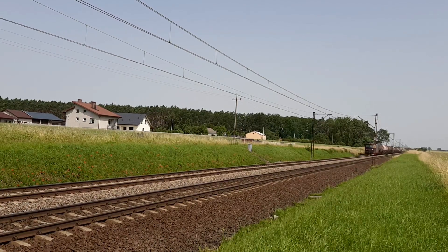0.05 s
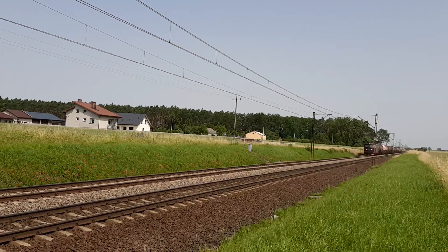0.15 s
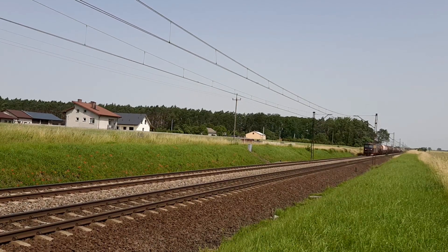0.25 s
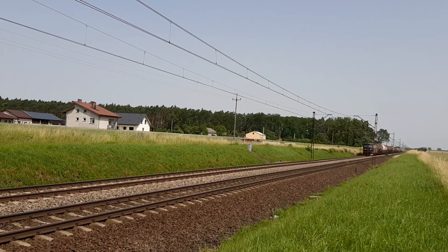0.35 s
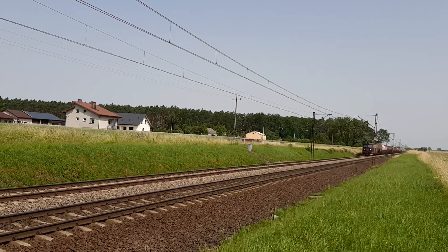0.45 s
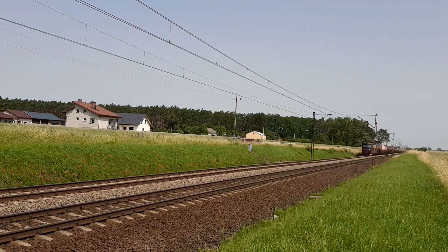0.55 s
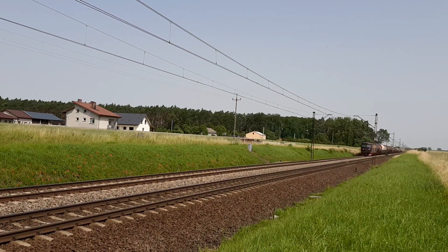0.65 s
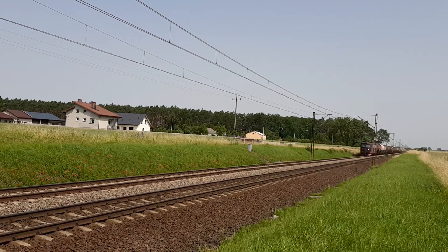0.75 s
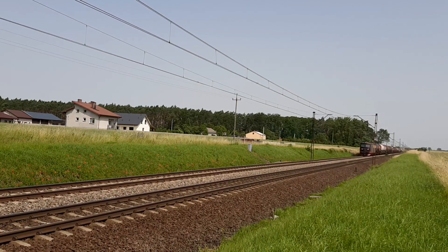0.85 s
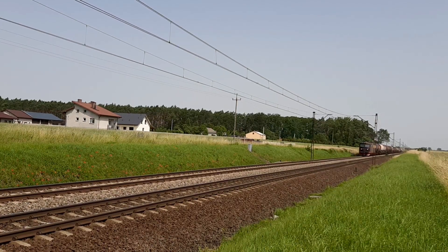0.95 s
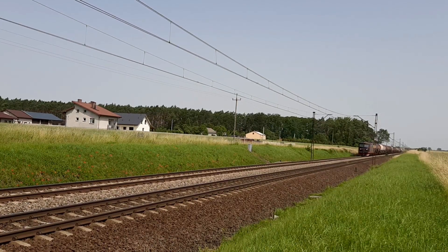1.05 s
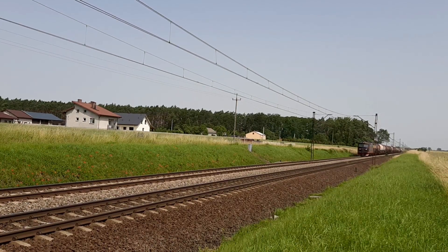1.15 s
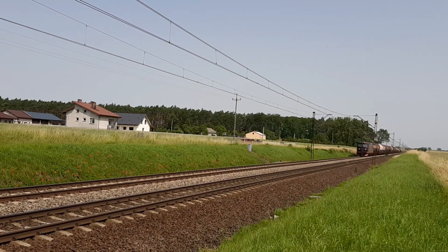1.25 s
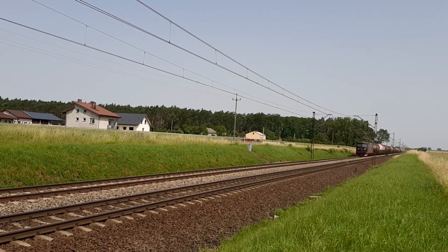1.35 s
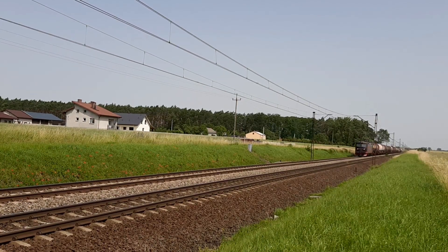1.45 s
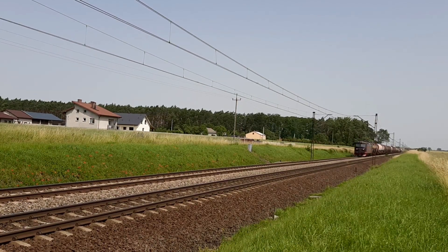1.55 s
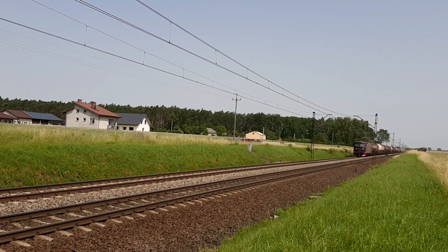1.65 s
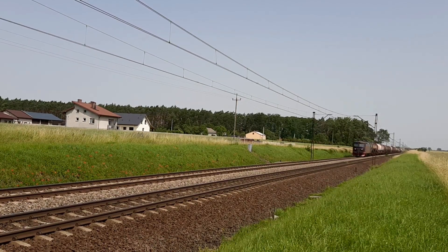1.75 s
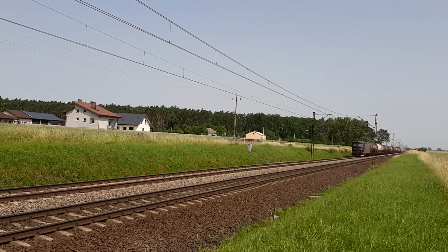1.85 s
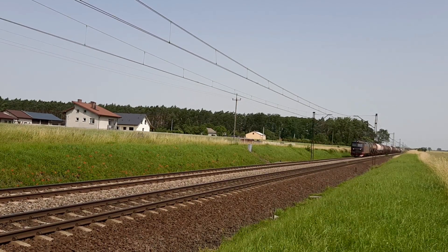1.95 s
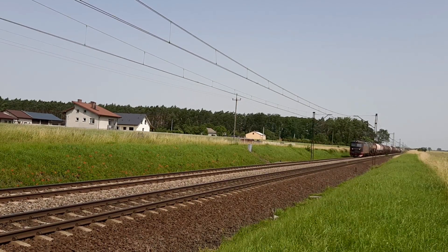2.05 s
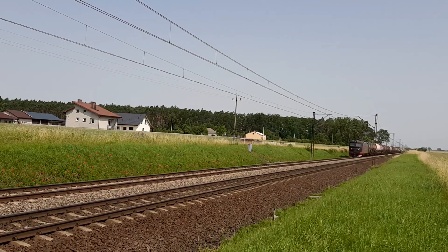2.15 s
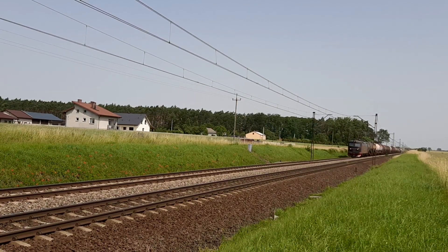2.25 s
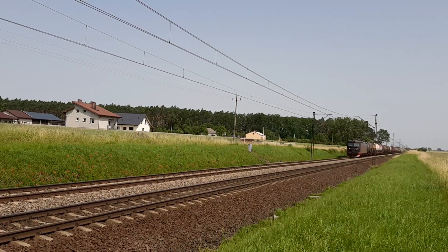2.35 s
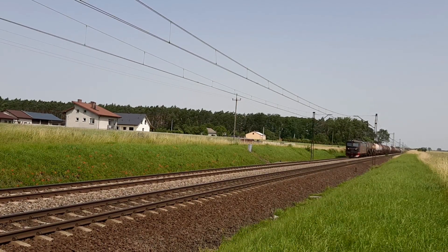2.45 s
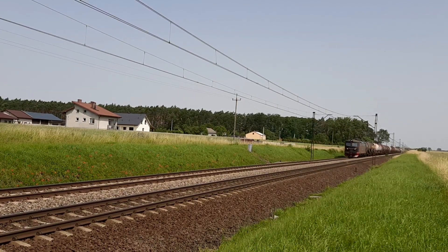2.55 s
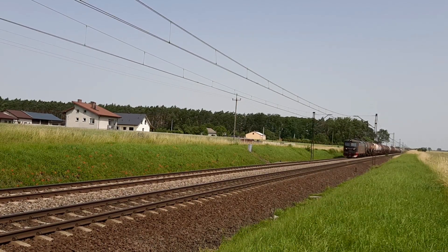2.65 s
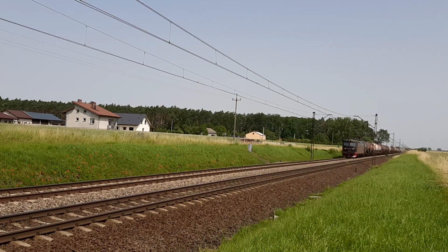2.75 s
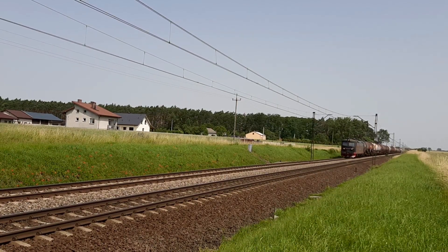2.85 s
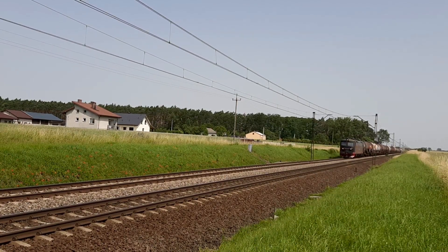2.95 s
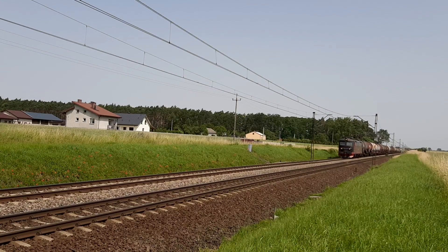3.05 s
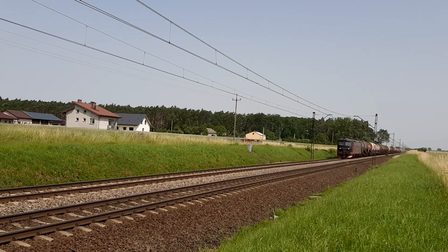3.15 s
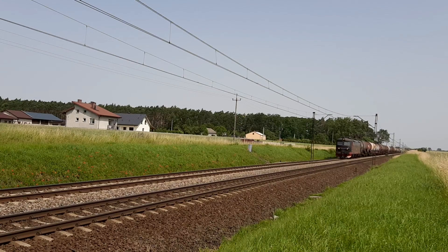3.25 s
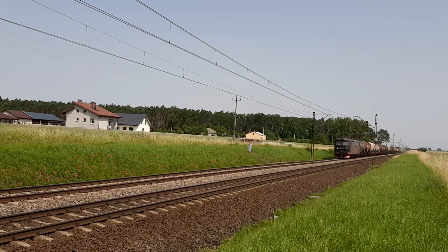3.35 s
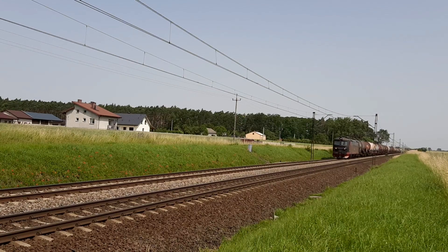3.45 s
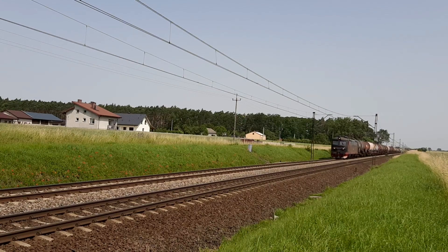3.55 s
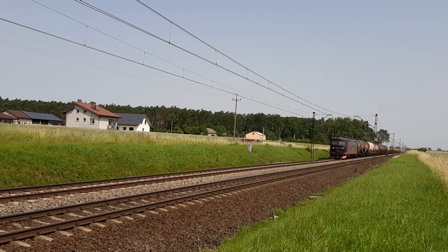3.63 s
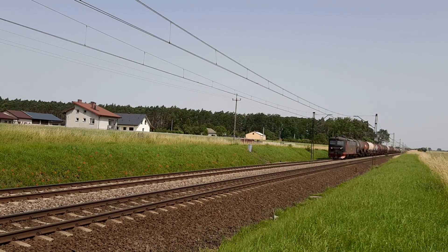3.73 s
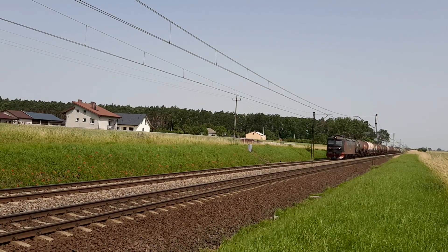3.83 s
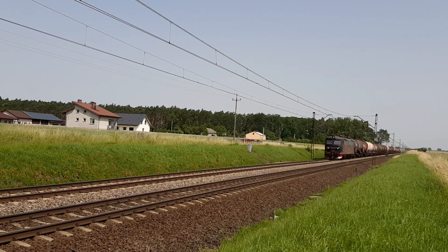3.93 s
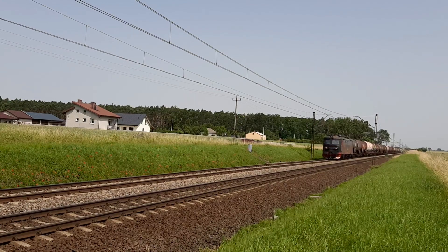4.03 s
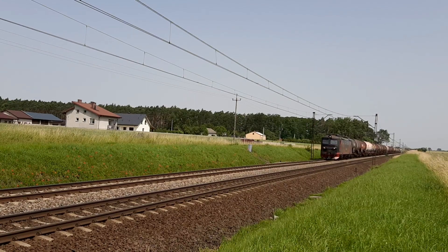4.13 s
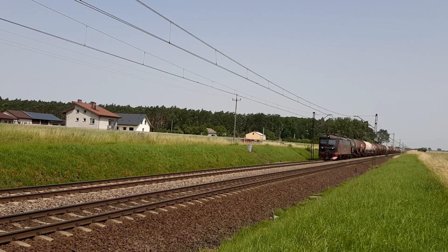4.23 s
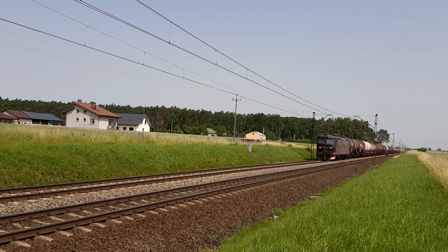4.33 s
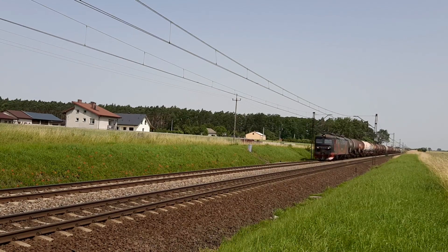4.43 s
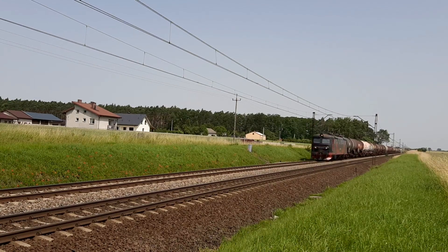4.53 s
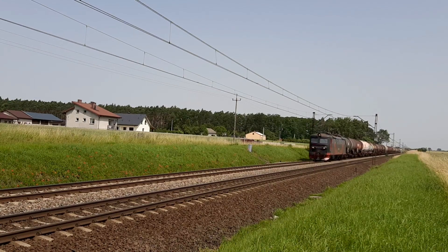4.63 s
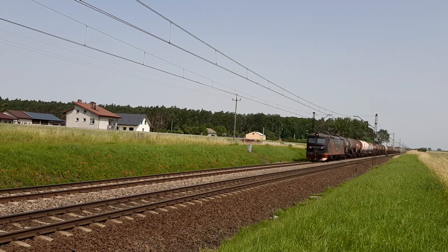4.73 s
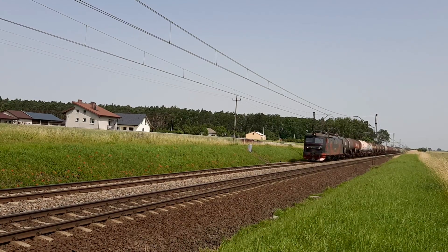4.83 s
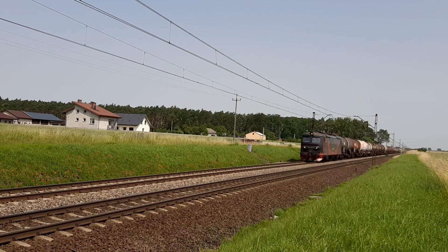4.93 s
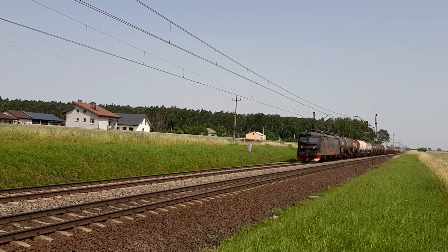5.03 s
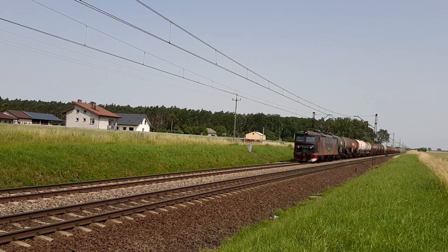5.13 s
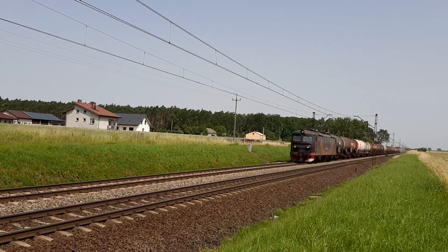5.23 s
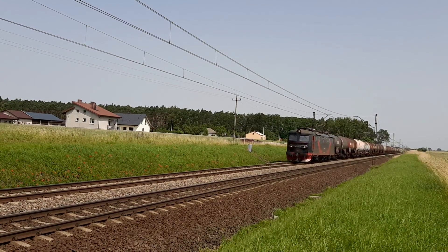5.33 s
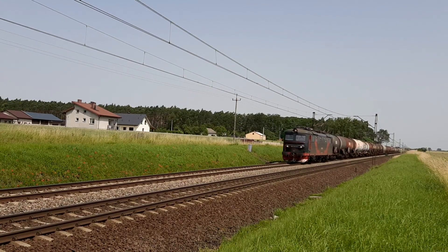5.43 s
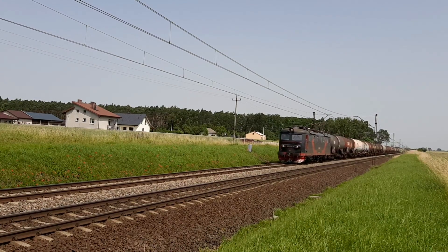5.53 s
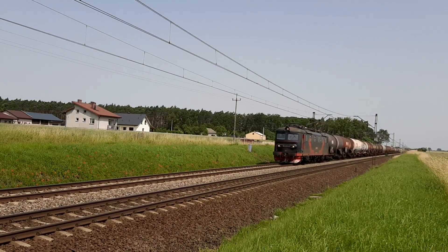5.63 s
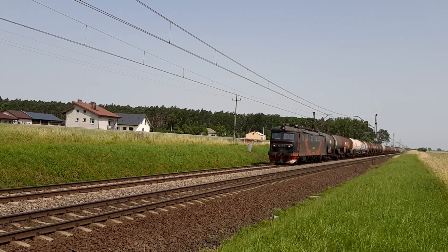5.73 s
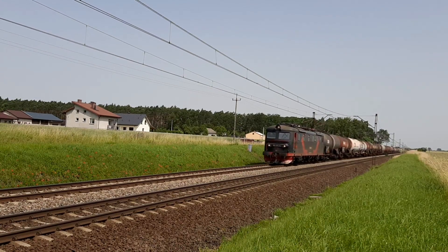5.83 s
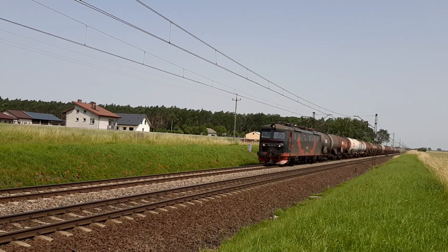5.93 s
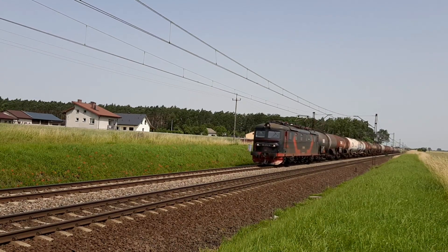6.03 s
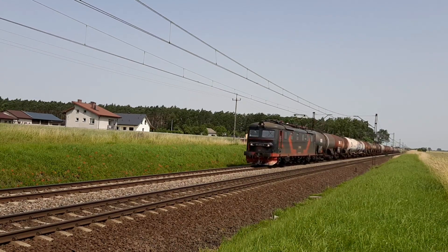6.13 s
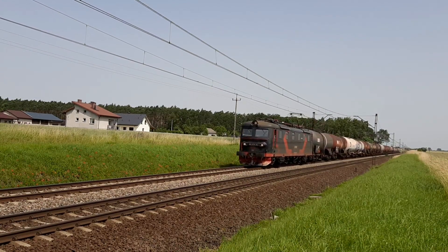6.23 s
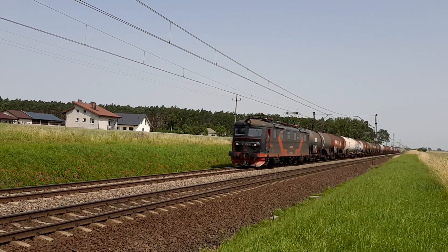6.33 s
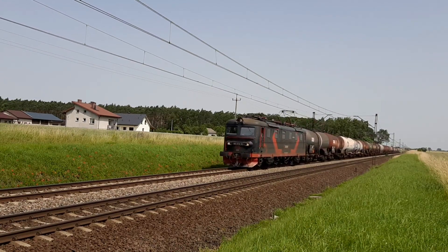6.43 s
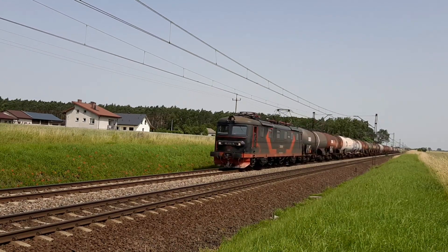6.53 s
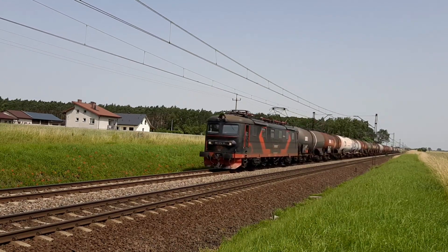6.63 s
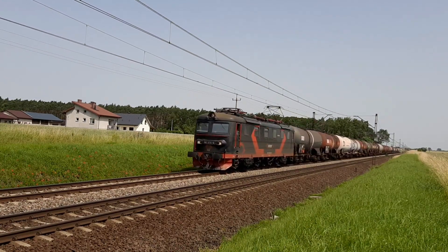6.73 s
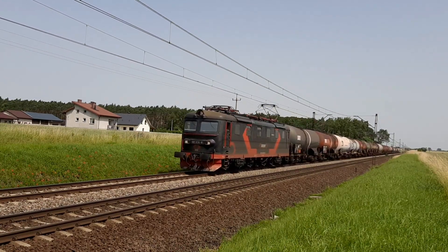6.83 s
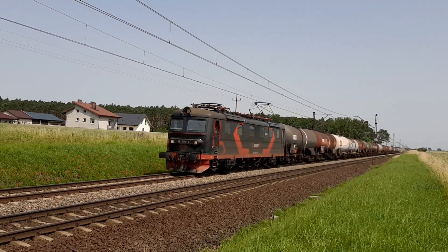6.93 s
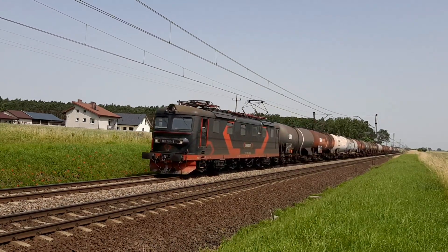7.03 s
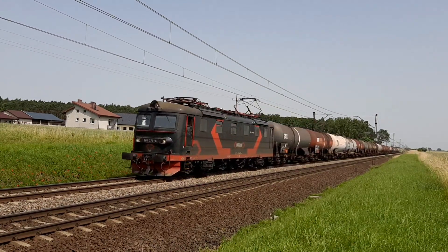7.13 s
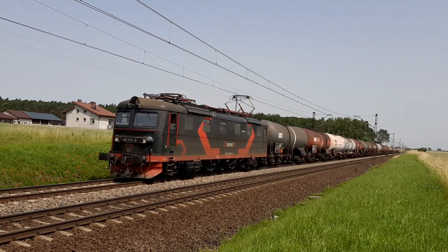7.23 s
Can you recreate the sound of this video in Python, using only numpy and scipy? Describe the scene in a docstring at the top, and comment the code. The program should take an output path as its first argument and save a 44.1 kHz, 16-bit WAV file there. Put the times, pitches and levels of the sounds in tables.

```python
"""From the start wind buffets two microphone ports, grass hisses, a rail whines, and a soft distant wash of an
electric freight train grows as it draws near. The rails sing ahead of it; a small bird chirps far off from 1.6 s
to 4 s. A hum rises at about 3 s and gears join near 6 s, as rumble and wheel roar swing from the right to the
front. The roar steps up at 6.75 s. Broad sounds are shaped noise, tones are wavering sines, eddies short pulses."""
import sys
import numpy as np
from scipy import signal
from scipy.fft import rfft, irfft, next_fast_len
from scipy.io import wavfile
from scipy.ndimage import uniform_filter1d, map_coordinates

SR = 44100
rng = np.random.default_rng(int(sys.argv[2]) if len(sys.argv) > 2 else 0)


def to_wav(sig):
    """Store sig (one row per channel, or 1-D mono) as 16-bit WAV at the path in sys.argv[1].

    Samples outside -1..1 are clipped; the rate is SR.
    """
    pcm = np.clip(np.atleast_2d(sig), -1, 1) * 32767
    pcm = np.round(pcm).astype(np.int16)
    wavfile.write(sys.argv[1], SR, pcm.T)  # frames by channels


N = 320818

# Phase between the ports for sounds that stay in place. Each row: frequency in Hz, lead of the left port in radians.
PORT_LEAD = [(0, -3.5), (340, 0.46), (1120, 2.5), (1380, 2), (1640, 6), (3010, 3.5), (3620, 1.5), (4130, 6),
             (6120, 8.5), (6890, 11), (7150, 2.5), (9220, 20.5), (11400, 28.5), (15300, 39.5)]
TOP_HZ = 15730  # upper band limit

# Soft distant wash of the far train. Each row: time in seconds, level in dB.
WASH_LEVEL = [(0, -58), (1.3, -58), (3.6, -54.5), (5.2, -50.5)]
# Spectrum of the wash. Each row: frequency in Hz, relative density in dB per Hz.
WASH_SPECTRUM = [(150, -46), (250, -19.5), (339, -1.5), (605, -5.5), (821, -4), (1150, -4.5), (1310, -22),
                 (1450, -8.5), (1770, -15), (3030, -16), (4110, -13.5), (6070, -17.5), (6820, -11.5),
                 (7230, -17.5), (8000, -47.5), (10400, -100), (17600, -120)]
# Correlation of the wash at the two ports. Each row: frequency in Hz, likeness (1 is identical).
WASH_LIKENESS = [(300, 0.18), (1500, 0.14), (5000, 0.068), (6000, 0.53), (6700, 0.46), (7500, 0.45)]
# Grass hiss before its offset at each port. Each row: time in seconds, level in dB.
GRASS_LEVEL = [(0.0, -70), (0.38, -76), (1.92, -72.5), (2.13, -76.5), (2.51, -68.5), (2.67, -71),
               (3.62, -73), (4.15, -66), (4.39, -70.5), (4.53, -64), (4.7, -67.5), (5.87, -60.5),
               (6.38, -62.5), (6.6, -60), (6.84, -61), (7.27, -57.5)]
# Spectrum of the grass hiss. Each row: frequency in Hz, relative density in dB per Hz.
GRASS_SPECTRUM = [(5060, -55.5), (8600, -44), (8750, -31), (9220, -10), (11200, -0.5), (12300, 3),
                  (13000, 2), (13800, -2), (14900, 2.5), (15600, -6.5)]

# Bird notes. Each row: start in seconds, length in seconds, start, middle and end pitch in Hz, level in dB.
BIRD_NOTES = [(1.591, 0.038, 4640, 3870, 3500, -55.5), (1.727, 0.016, 3500, 3570, 3650, -53.5),
              (1.9, 0.053, 3300, 3150, 3550, -57), (2.195, .04, 2680, 2720, 2680, -61),
              (2.283, 0.048, 3430, 3580, 3400, -55), (2.357, .035, 3670, 3580, 3650, -63),
              (2.437, 0.049, 4180, 3830, 3650, -59), (2.642, 0.032, 3230, 3320, 3320, -61),
              (2.93, 0.04, 2950, 2900, 2860, -62), (3.018, 0.04, 3830, 3620, 3500, -63),
              (3.77, .07, 3480, 3800, 4000, -63), (3.924, 0.085, 4080, 3800, 3750, -64)]
BIRD_DELAY_MS = .49  # the song reaches the left port this much later

# Wind flutter, mean of the two ports. Each row: time in seconds, level in dB.
WIND_LEVEL = [(0, -39), (.1, -59.5), (.45, -61), (.85, -71), (1.17, -62.5), (1.45, -74), (2.1, -67.5),
              (2.5, -53.5), (3.1, -63.5), (3.65, -59.5), (3.92, -52), (4.35, -51.5), (4.75, -54),
              (5, -49.5), (5.2, -54), (5.35, -42.5), (5.7, -53), (6.3, -51), (7.27, -48)]
# Which port the wind meets. Each row: time in seconds, left minus right level in dB.
WIND_LEAN = [(0, 3), (.9, 26.5), (1.6, 10.5), (3, 2.5), (4.4, -6), (5.1, 18.5), (5.6, -3), (7.27, 1.5)]
# Spectrum of the flutter. Each row: frequency in Hz, relative density in dB per Hz.
FLUTTER_SPECTRUM = [(12, -52), (20, -15.5), (48, 0), (70, -3), (103, -4.5), (253, -19.5), (300, -15),
                    (390, -41), (660, -120)]
# Strong eddies. Each row: moment in seconds, left level in dB, right level in dB, cycle rate in Hz.
STRONG_EDDIES = [(0.013, -37, -38, 71), (.038, -36, -32.5, 81.5), (.146, -43, -56, 81),
                 (.263, -36.5, -47, 100), (.288, -41, -45, 113), (.324, -36, -64, 86),
                 (0.483, -42, -40, 86), (0.641, -38, -55, 87), (.776, -43, -73, 65.5), (.82, -48, -73, 62),
                 (.964, -45, -74, 90), (1.062, -44, -70, 105), (1.203, -50, -45, 69), (1.373, -43, -70, 75),
                 (1.553, -45, -73, 93), (1.851, -55, -50, 67.4), (2.149, -48, -53, 85),
                 (2.272, -47, -57, 77.5), (2.383, -46, -68, 107), (2.456, -37.5, -48, 104),
                 (2.488, -49, -45, 91), (2.587, -46, -41, 80), (2.9, -50, -49, 75), (3.427, -47, -52, 83.4),
                 (3.545, -46, -47, 76.5), (3.825, -36, -36, 91), (3.875, -37, -59, 72),
                 (3.915, -39, -38, 121), (3.937, -35, -55, 95), (3.972, -36, -36, 83),
                 (4.014, -37, -45, 103), (4.095, -38, -40, 96), (4.384, -70, -36, 67),
                 (4.459, -45, -40, 107), (4.67, -38, -41, 116), (4.804, -39, -46, 75),
                 (4.845, -38, -41, 76), (4.986, -27, -56, 75), (5.089, -34, -62, 83), (5.178, -27, -58, 99),
                 (5.266, -32, -56, 69), (5.37, -30, -30, 99), (5.492, -35, -35, 101), (5.793, -32, -32, 92),
                 (5.879, -38, -36, 95), (5.93, -37, -33, 99), (6.108, -37, -37, 130),
                 (6.194, -42, -43, 105)]
# Lesser eddies: median rate, level over the wind and its scatter, median cycle rate.
SMALL_PER_S, SMALL_DB, SMALL_SCATTER_DB, SMALL_HZ = 5, 7, 3, 88

# Resonances of the rail ahead. Each row: frequency in Hz, width in Hz, relative level in dB.
RAIL_MODES = [(653, 53, -3), (787, 176, -4), (886, 32, -6), (977, 74, -8)]
# Spectrum of the rail under the locomotive. Each row: frequency in Hz, relative density in dB per Hz.
UNDER_SPECTRUM = [(320, -42), (540, -31.5), (617, 0), (702, -1.5), (750, -5.5), (852, -6.5), (951, -12),
                  (1080, -18), (1150, -14.5), (1500, -38), (2530, -120)]
# Phase of that sound. Each row: frequency in Hz, lead of the left port in radians.
UNDER_LEAD = [(480, 0.88), (600, 1.3), (1100, 1.3)]
# Arrival of that sound. Each row: time in seconds, its share of the rail sound's power from 0 to 1.
ARRIVAL = [(5.8, 0.015), (6.6, 0.99)]
# Clear rail notes that grow with the hum. Each row: frequency in Hz, width in Hz, relative level in dB.
SINGING_MODES = [(662.5, 12, 0), (497, 9, -3)]
NOTE_DB = -3.5  # the rail notes against the hum
# Whine between two neighbouring modes. Each row: time in seconds, upper mode's share of power, level in dB.
WHINE = [(0, 0.86, -51), (.4, 0.92, -58), (1.2, 0.97, -56), (2.3, 0.1, -50.5), (3.5, .01, -49.5),
         (4.85, 0.03, -41), (5, 0.03, -44), (6.5, 0.5, -44), (7.27, .9, -44)]

# Spectrum of the body panels. Each row: frequency in Hz, relative density in dB per Hz.
BODY_SPECTRUM = [(120, -36.5), (200, -16), (264, -11), (311, -8.5), (355, -9), (419, -3), (466, -4.5),
                 (523, -15), (600, -9), (780, -31), (1320, -120)]
# Modes of the body. Each row: frequency in Hz, width in Hz, relative level in dB.
FRAME_MODES = [(292, 20, 2), (322, 14.6, 4), (386.5, 10.2, 5)]
# Spectrum of the low rolling sound. Each row: frequency in Hz, relative density in dB per Hz.
ROLL_SPECTRUM = [(15, -44), (30, -23), (55, -2.5), (85, 6.5), (120, 1), (170, -0.5), (250, 1), (330, -38),
                 (570, -120)]
# Spectrum of the wheel roar. Each row: frequency in Hz, relative density in dB per Hz.
ROAR_SPECTRUM = [(650, -50), (1100, -22.5), (1210, -5), (1260, 2.5), (1400, -9.5), (1520, 0), (1680, -5),
                 (1920, -5), (2070, -0.5), (2190, -4), (2490, -3.5), (3100, -13), (4030, -43), (6820, -120)]
# Wheel modes. Each row: frequency in Hz, width in Hz, relative level in dB.
WHEEL_MODES = [(1298, 11, -47.5), (1821, 13, -49), (2350, 25, -47.5), (2565, 21, -49.5), (1540, 25, -59.5),
               (1994, 25, -51.5), (2437, 39, -48), (2480, 10, -51.5), (3835, 18, -53)]
# Spectrum of the upper roar. Each row: frequency in Hz, relative density in dB per Hz.
GRIT_SPECTRUM = [(1760, -35), (3000, -3.5), (3330, -2.5), (3670, -2.5), (5630, -7), (6960, -16.5),
                 (8480, -35.5), (9000, -30.5), (11700, -56), (19800, -120)]
# Gear mesh of the leading bogie. Each row: time in seconds, level in dB.
GEAR_LEVEL = [(6.1, -52), (6.35, -33.5), (6.55, -33), (6.75, -23.5), (7, -25), (7.27, -28)]
# Harmonics of the gear mesh. Each row: multiple of the mesh frequency, relative level in dB.
MESH_HARMONICS = [(1, 0), (2, -20.5), (3, -20)]
# A second, slightly higher hum. Each row: time in seconds, level in dB.
HUM_LEVEL = [(3, -75), (3.8, -55.5), (4.5, -49.5), (5.2, -43.5), (5.7, -38.5), (6.2, -43), (6.7, -33),
             (7.27, -34)]
MESH_HZ, HUM_HZ = 416.3, 436.5

# The locomotive's speed, the moment it would draw level, the gap to the track.
SPEED_M_S, PASS_S, SIDE_M = 17.5, 8.529, 9.2
NEAR_M = 25  # reference distance for the growth levels
# Growth laws of five parts. Each row: level in dB at NEAR_M, spreading in dB per tenfold distance,
# loss in dB per metre.
RAILS_GROW = (-30, 3.8, 0.27)
RUMBLE_GROWS = (-26.5, 23.2, 0.28)
ROLL_GROWS = (-34.5, 20, 0.31)
ROAR_GROWS = (-30.5, 48.5, 0.074)
GRIT_GROWS = (-33.5, 11.6, 0.64)
GRIT_FULL_DB = -40  # close by, the upper roar stops growing
# Sound travel time between the ports; radians from the track to the front of the microphone.
PORTS_MS, AIM_RAD = 0.7, .33
JUDDER_DB, JUDDER_PER_S = 1.3, 20  # uneven wheels shake rail and body in quick swells
STEP_S, STEP_RISE_S, STEP_DB = 6.75, .015, 2.5  # the roar of the wheels steps up suddenly


def amp(db):
    """Decibels are twenty times the logarithm of amplitude."""
    return 10 ** (np.asarray(db) / 20)


def unit(x):
    """Dividing by the root mean square gives a signal unit power."""
    return x / np.sqrt(np.mean(x ** 2) + 1e-20)


def along(points, hz):
    """Interpolation of (Hz, value) points on a logarithmic frequency axis."""
    f, v = np.transpose(points)
    return np.interp(np.log(hz + 1), np.log(f + 1), v)


def curves(rows):
    """Linear interpolation in time: one value per sample for each column after the time."""
    s, *cols = np.transpose(rows)
    return [np.interp(np.arange(N) / SR, s, c) for c in cols]


def faded(rows, fade_db):
    """Onset of a level curve (last column): a rise over the 0.6 s before its first row."""
    first = rows[0]
    return [(first[0] - .6, *first[1:-1], first[-1] + fade_db), *rows]


def wobble(rate):
    """Band-limited random fluctuation: a smooth curve through rate random knots a second."""
    knots = rng.standard_normal(int(N * rate / SR) + 4)
    return map_coordinates(knots, [np.arange(N) * rate / SR])


def tone(hz, waver_hz):
    """Phase is the integral of frequency, here one that wavers at random."""
    return 2 * np.pi * np.cumsum(hz + waver_hz * wobble(25)) / SR


def filtered(x, response):
    """Linear filtering: the spectrum of x times a complex response of frequency."""
    m = next_fast_len(N + 8192)
    return irfft(rfft(x, m) * response(np.fft.rfftfreq(m, 1 / SR)), m)[..., :N]


def modes(table):
    """Incoherent summation: the powers of noise-driven resonances add."""
    def gain(f):
        return np.sqrt(sum(amp(2 * db) / (1 + ((f - c) * 2 / w) ** 4) for c, w, db in table))
    return gain


def shape(points):
    """Spectral density set by a gain curve over frequency."""
    return lambda f: amp(along(points, f))


def rush(gain, alike, patchy_db, lead=((0, 0),)):
    """Partial coherence: patchy stereo noise of rms 1; lead is the phase of the left port over the right."""
    z = signal.stft(rng.standard_normal((2, N)), nperseg=512)[2]
    patches = rng.standard_normal(z.shape[1:])
    patches = uniform_filter1d(uniform_filter1d(patches, 6, 0), 12, 1)
    pair = signal.istft(z * amp(patchy_db * unit(patches)), nperseg=512)[1][:, :N]

    def mid_side(f):
        # the angle splits power so that the ports correlate as alike asks
        angle = np.arccos(np.clip(along(alike, f), -1, 1)) / 2
        return gain(f) * [np.cos(angle), np.sin(angle)]

    def port_phase(f):
        return np.exp(np.outer([.5j, -.5j], np.interp(f, *np.transpose(lead))))

    mid, side = filtered(pair, mid_side)
    return unit(filtered(np.array([mid + side, mid - side]), port_phase))


def ahead_m():
    """Uniform motion: how far up the track the locomotive still is."""
    return SPEED_M_S * (PASS_S - np.arange(N) / SR)


def nearing_db(near_db, spread_db, loss_db_per_m):
    """Spreading and absorption: level falls with the logarithm of distance and a little on every metre."""
    r = np.hypot(ahead_m(), SIDE_M)
    return near_db - spread_db * np.log10(r / NEAR_M) - loss_db_per_m * (r - NEAR_M)


def juddering(growth):
    """Amplitude modulation: uneven wheels add quick random swells to a growing level."""
    return amp(nearing_db(*growth) + JUDDER_DB * wobble(JUDDER_PER_S))


def distant_wash():
    """Diffuse sound with partial coherence: the soft wash of the far train, growing as it nears."""
    wash = rush(shape(WASH_SPECTRUM), WASH_LIKENESS, patchy_db=1.3, lead=PORT_LEAD)
    return amp(curves(WASH_LEVEL)[0]) * wash


def grass():
    """High-frequency noise with a level difference between the ports: a fine hiss to the left."""
    hiss = rush(shape(GRASS_SPECTRUM), [(9000, 0.26), (12000, 0.31)], patchy_db=0.3, lead=PORT_LEAD)
    hiss = hiss * amp(curves(GRASS_LEVEL)[0] + .8 * wobble(12))
    return hiss * amp([[4], [1.1]])  # left, right dB


def bird():
    """Frequency glide and interaural delay: short soft-edged whistles from the far right."""
    song = np.zeros(N)
    for s, length, *hz, db in BIRD_NOTES:
        u = np.arange(0, 1, 1 / (length * SR))  # progress through the note
        pitch = np.polyval(np.polyfit([0, .5, 1], hz, 2), u)
        whistle = np.sin(2 * np.pi * np.cumsum(pitch) / SR)
        song[round(s * SR):][:len(u)] += amp(db) * whistle * np.sin(np.pi * u) ** 0.27
    late = filtered(song, lambda f: np.exp(-2j * np.pi * f * BIRD_DELAY_MS / 1000))
    return np.array([amp(-0.5) * late, song])


def eddy_push(t, hz, phase, skew):
    """Vortex pressure pulse: it strikes fast and rings down in a cycle or two."""
    cycles = t * hz + 0.26
    swell = np.exp(-(cycles / np.where(cycles < 0, .4, 1.5)) ** 2)
    sagging = cycles - 0.15 * cycles * np.abs(cycles)  # the pitch drops as the eddy passes
    # the pitch peaks at 1.2 times hz; skew sets the ports apart in phase
    push = swell * np.cos(2.4 * np.pi * sagging + np.pi * (phase + np.outer([.4, -.4], skew)))
    front = np.exp(-(cycles / 0.19) ** 2) * np.cos(5.6 * np.pi * cycles + np.pi * skew)
    return push + amp(-12) * front  # its sharp front edge


def wind():
    """Turbulent pressure at each port: a low flutter with single eddies on top."""
    ports_db = curves(WIND_LEVEL)[0] + np.outer([.5, -.5], curves(WIND_LEAN)[0])
    lumps = amp(3.2 * np.array([wobble(18), wobble(18)]))
    flutter = unit(lumps * rush(shape(FLUTTER_SPECTRUM), [(60, 0.3)], patchy_db=3.5))

    draws = rng.standard_normal((100, 4))
    times = np.cumsum(np.exp(0.55 * draws[:, 0])) / SMALL_PER_S
    lesser = []
    for s, z in zip(times, draws):
        if s * SR < N:
            levels = ports_db[:, int(s * SR)] + SMALL_DB + SMALL_SCATTER_DB * z[1:3]
            lesser.append((s, *levels, SMALL_HZ * np.exp(0.27 * z[3])))

    half = SR // 20  # samples on either side of an eddy's moment
    thumps, t = np.zeros((2, N + SR)), np.arange(-half, half) / SR
    chance = rng.uniform(-1, 1, (200, 2))
    for (s, left_db, right_db, hz), (phase, skew) in zip([*STRONG_EDDIES, *lesser], chance):
        push = eddy_push(t, hz, phase, skew)
        thumps[:, round(s * SR):][:, :len(t)] += amp([[left_db], [right_db]]) * push
    return amp(ports_db) * flutter + thumps[:, half:][:, :N]


def rail_whine():
    """Neighbouring modes exchanging power: the whine drifts between a lower and an upper pitch."""
    share, db = curves(WHINE)
    share = np.clip(share, 0, 1)
    lower = rush(modes([(1221.6, 49, -0.5), (1221, 121, -11.0)]), [(1200, 0.93)],
                 patchy_db=1.0, lead=PORT_LEAD)
    upper = rush(modes([(1312, 58, -0.32), (1219, 34, -1)]), [(1200, 0.92)],
                 patchy_db=3.0, lead=PORT_LEAD)
    return amp(db) * (np.sqrt(1 - share) * lower + np.sqrt(share) * upper)


def rails():
    """Structure-borne sound: wheel vibration runs far ahead along the steel, so the near track sings first."""
    ahead = rush(modes(RAIL_MODES), [(600, 1.0), (1000, 0.78)], patchy_db=1.5, lead=PORT_LEAD)
    under = rush(shape(UNDER_SPECTRUM), [(600, 1.0), (1100, 0.99)], patchy_db=2.0, lead=UNDER_LEAD)
    arrived = np.clip(curves(ARRIVAL)[0], 0, 1)
    song = juddering(RAILS_GROW) * (np.sqrt(1 - arrived) * ahead + np.sqrt(arrived) * under)
    notes = rush(modes(SINGING_MODES), [(600, 0.85)], patchy_db=2.5, lead=PORT_LEAD)
    notes = amp(curves(faded(HUM_LEVEL, -36))[0] + NOTE_DB) * (1 - arrived) * notes
    return song + notes + rail_whine()


def body_rumble():
    """Forced vibration of panels and frame modes, with a low rolling noise beneath."""
    panels = rush(shape(BODY_SPECTRUM), [(200, 1.0), (300, 0.91)], patchy_db=0.0)
    frame = amp(-5.5) * rush(modes(FRAME_MODES), [(300, 0.99)], patchy_db=2.8)
    roll = rush(shape(ROLL_SPECTRUM), [(40, 0.55), (130, 1.0)], patchy_db=2.0)
    return juddering(RUMBLE_GROWS) * (panels + frame) + amp(nearing_db(*ROLL_GROWS)) * roll


def wheels():
    """Rolling noise and wheel resonance: roar, ringing modes and an upper roar, with one sudden step."""
    roar = rush(shape(ROAR_SPECTRUM), [(1200, 0.98), (2000, 0.85), (3000, 1.0)], patchy_db=2.0)
    ring = amp(-6.5) * rush(modes(WHEEL_MODES), [(1000, 0.94)], patchy_db=2.5)
    grit = rush(shape(GRIT_SPECTRUM), [(3000, 0.9), (5000, 0.49), (7000, 0.24)], patchy_db=0.8)
    grit = amp(np.minimum(nearing_db(*GRIT_GROWS), GRIT_FULL_DB)) * grit
    step = amp(STEP_DB * np.clip((np.arange(N) / SR - STEP_S) / STEP_RISE_S, 0, 1))
    return step * (amp(nearing_db(*ROAR_GROWS)) * (roar + ring) + grit)


def gears():
    """Periodic tooth contact: harmonics of a wavering mesh frequency, beside a second hum."""
    turn = tone(MESH_HZ, waver_hz=2.2)
    mesh = sum(amp(db + 2.6 * wobble(16)) * np.sin(k * turn) for k, db in MESH_HARMONICS)
    hum = np.sin(tone(HUM_HZ, waver_hz=1.6))
    hum = amp(curves(faded(HUM_LEVEL, -15))[0] + 2.5 * wobble(22)) * hum
    return amp(curves(faded(GEAR_LEVEL, -25.0))[0]) * mesh + hum


def locomotive():
    """Moving-source delay: all airborne parts share one bearing, heard as a time shift at the left port."""
    left, right = body_rumble() + wheels() + gears()
    bearing = AIM_RAD - np.arctan2(SIDE_M, ahead_m())  # positive to the right of the front
    late = PORTS_MS * np.sin(bearing) * SR / 1000  # samples
    return np.array([map_coordinates(left, [np.arange(N) - late], order=5, mode="nearest"), right])


def scene():
    """Superposition: the pressures of all sources add."""
    return distant_wash() + grass() + bird() + wind() + rails() + locomotive()


def record(dry):
    """Band limiting: nothing at or above TOP_HZ passes."""
    return filtered(dry, lambda hz: hz < TOP_HZ)


dry = scene()
out = record(dry)
to_wav(out)
```